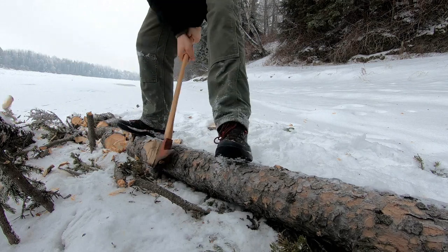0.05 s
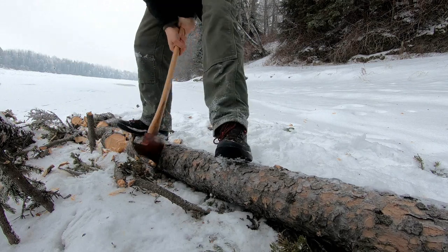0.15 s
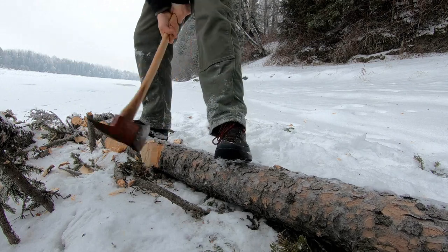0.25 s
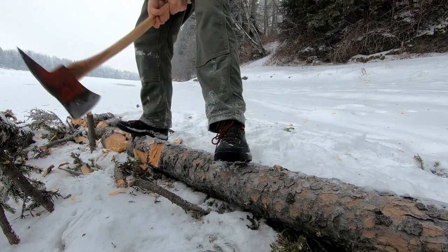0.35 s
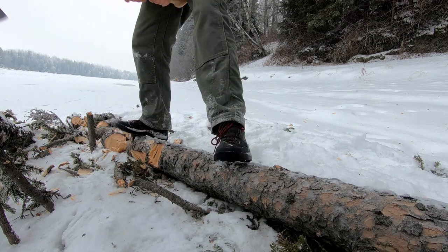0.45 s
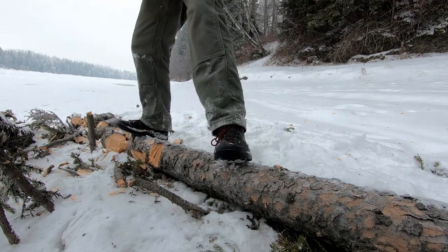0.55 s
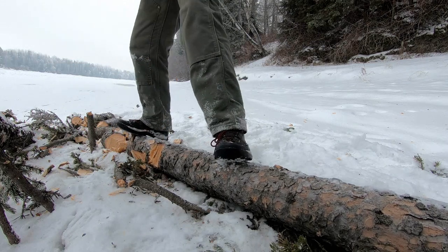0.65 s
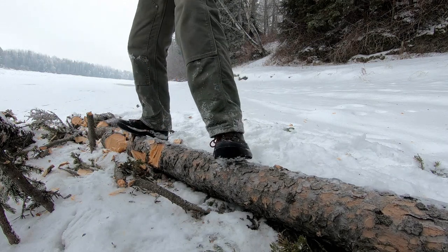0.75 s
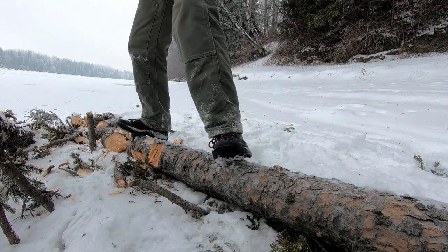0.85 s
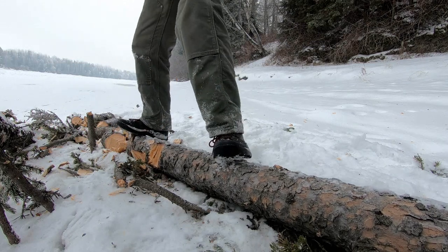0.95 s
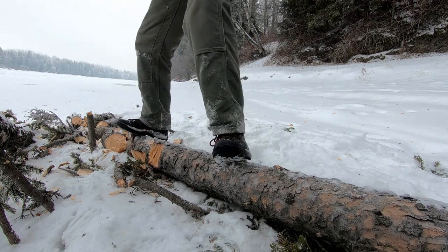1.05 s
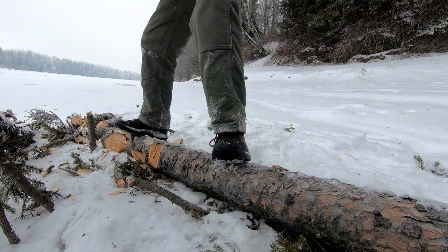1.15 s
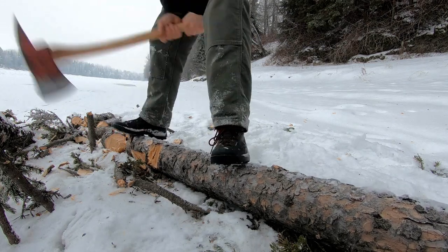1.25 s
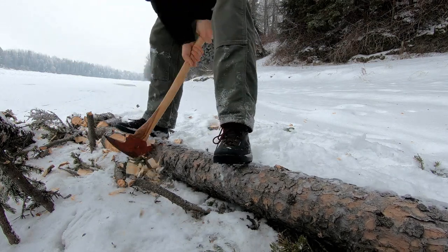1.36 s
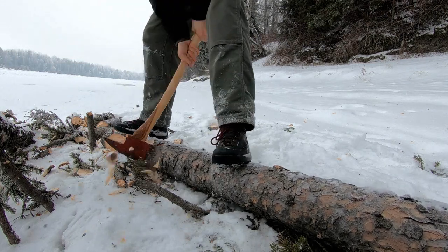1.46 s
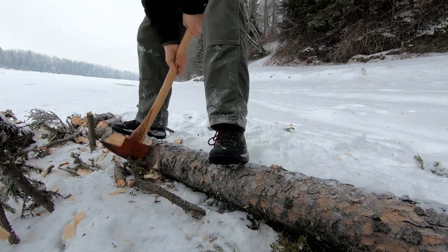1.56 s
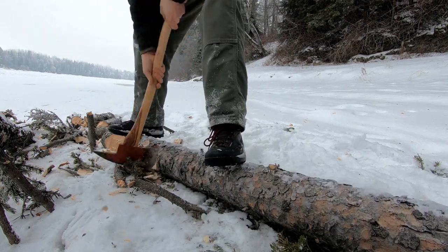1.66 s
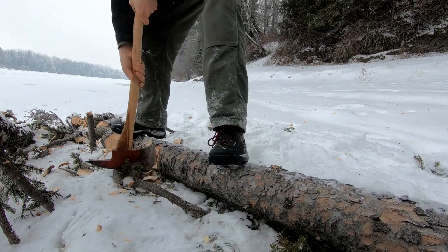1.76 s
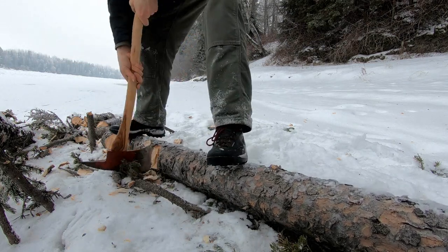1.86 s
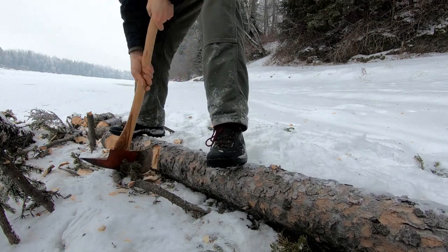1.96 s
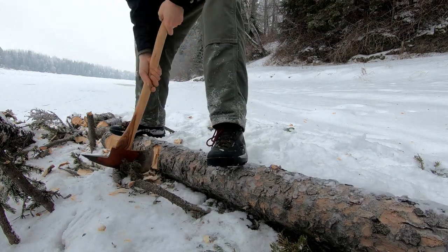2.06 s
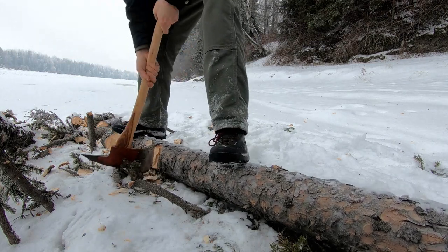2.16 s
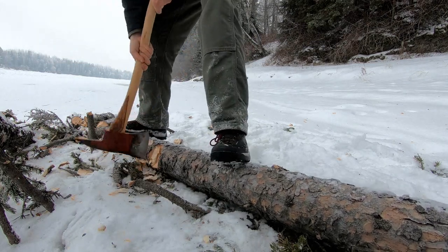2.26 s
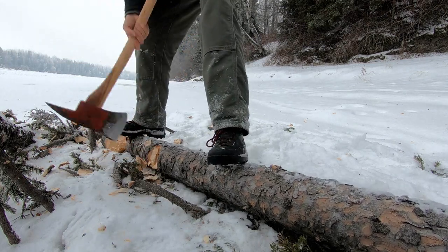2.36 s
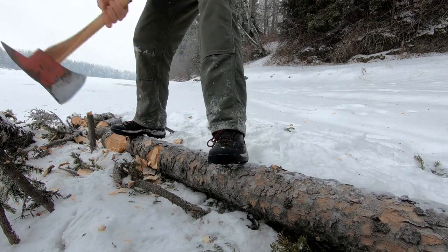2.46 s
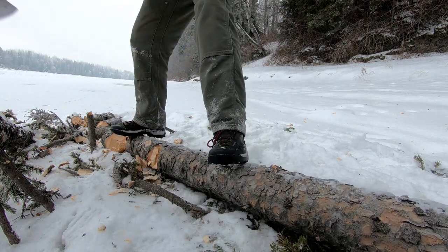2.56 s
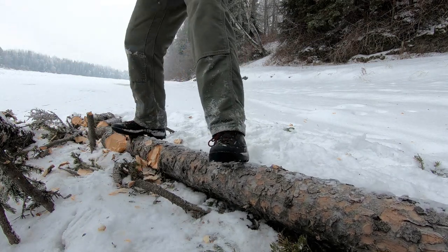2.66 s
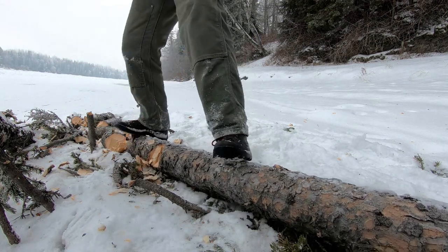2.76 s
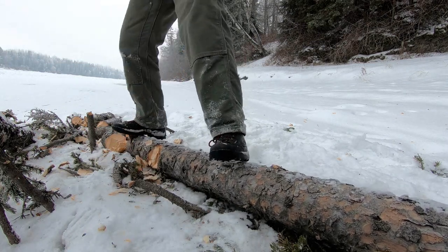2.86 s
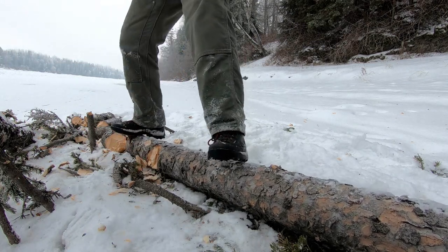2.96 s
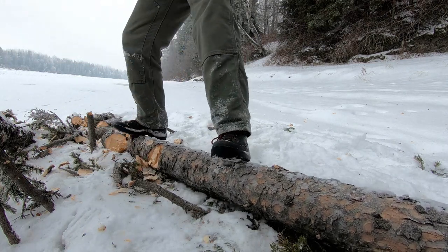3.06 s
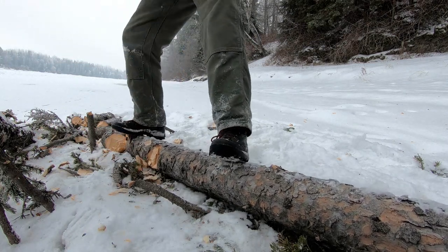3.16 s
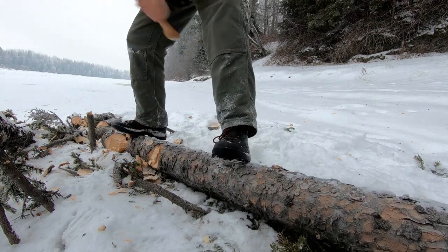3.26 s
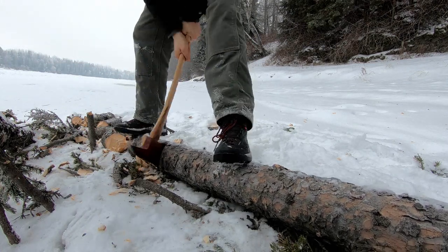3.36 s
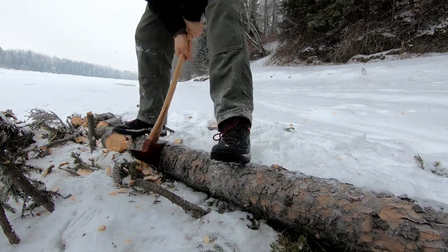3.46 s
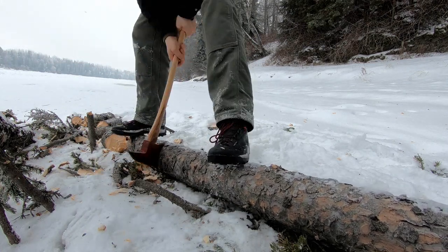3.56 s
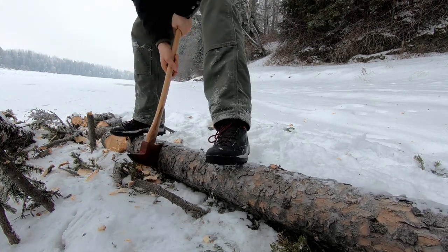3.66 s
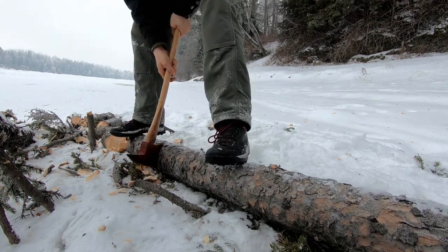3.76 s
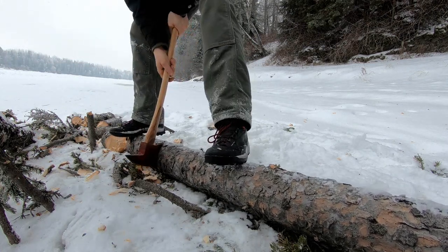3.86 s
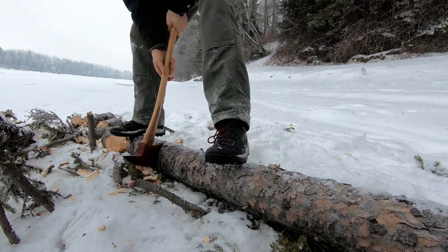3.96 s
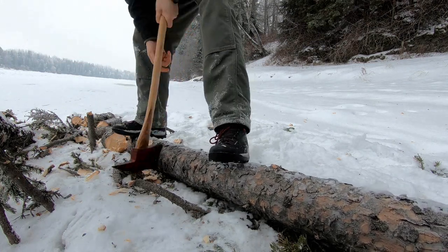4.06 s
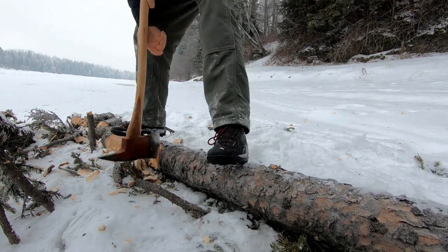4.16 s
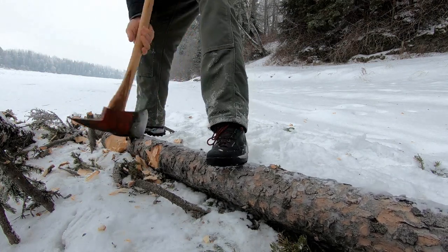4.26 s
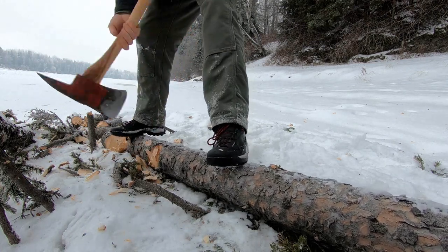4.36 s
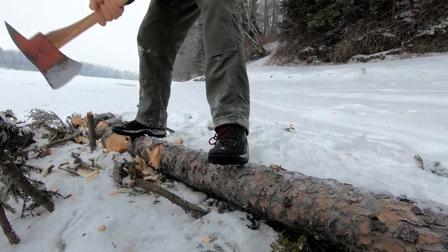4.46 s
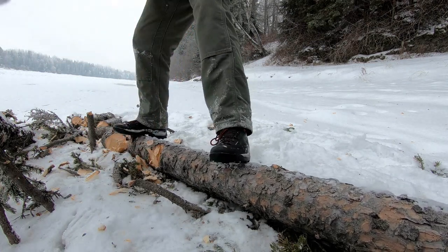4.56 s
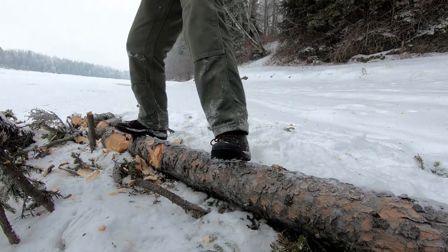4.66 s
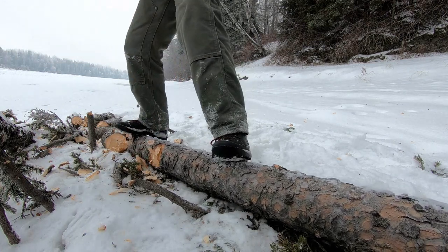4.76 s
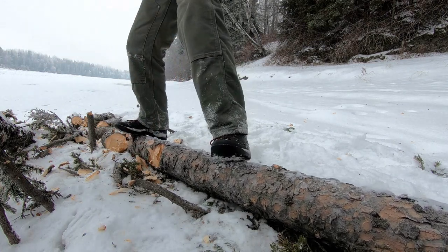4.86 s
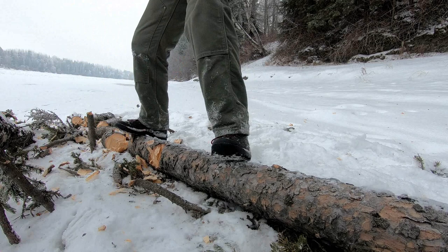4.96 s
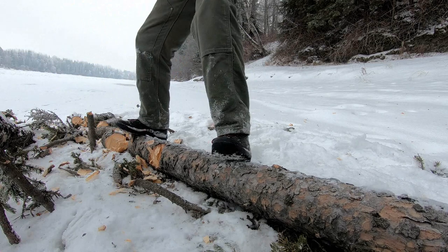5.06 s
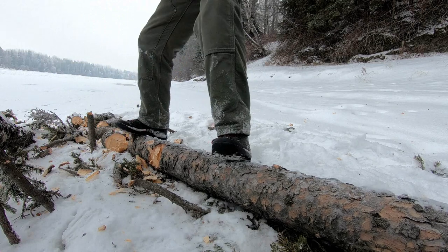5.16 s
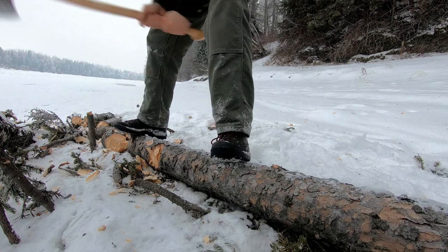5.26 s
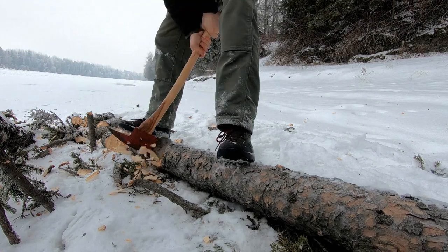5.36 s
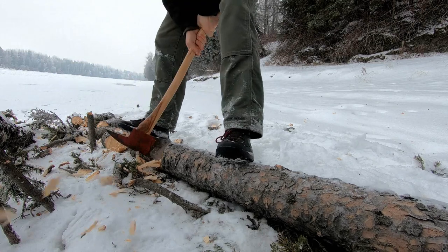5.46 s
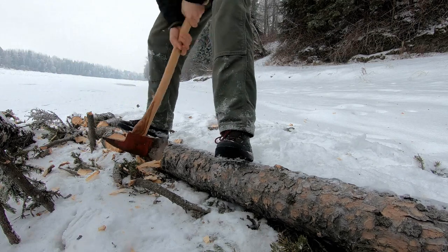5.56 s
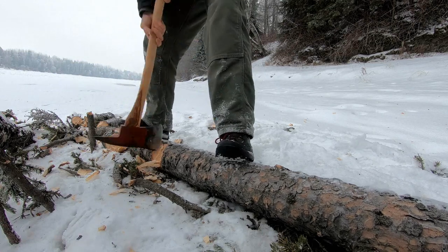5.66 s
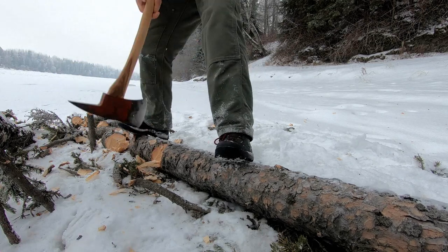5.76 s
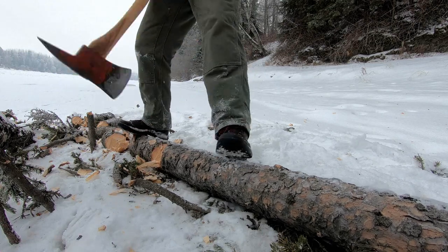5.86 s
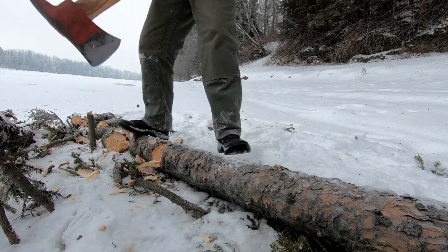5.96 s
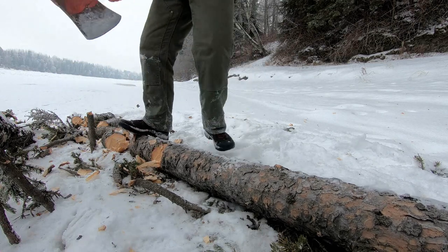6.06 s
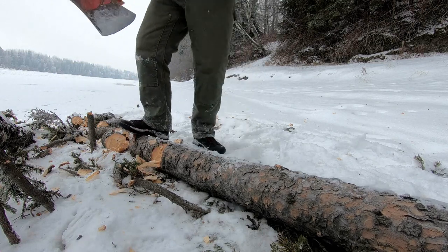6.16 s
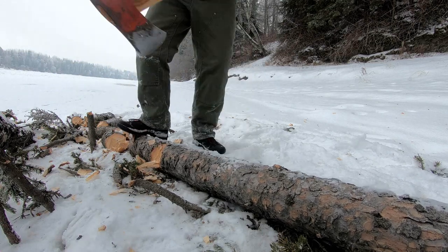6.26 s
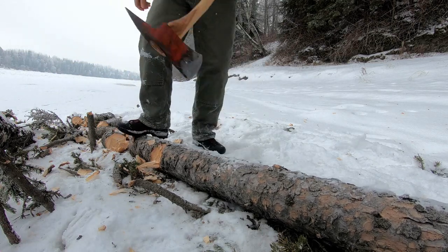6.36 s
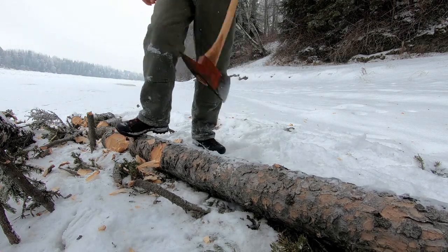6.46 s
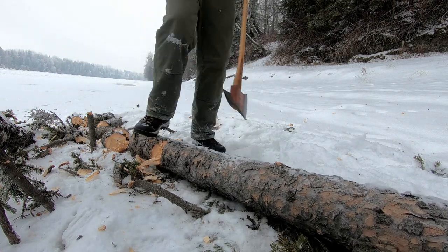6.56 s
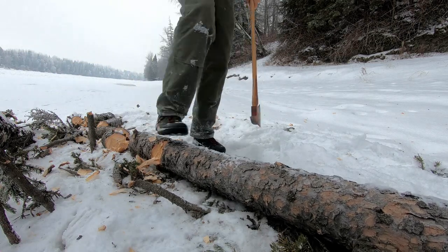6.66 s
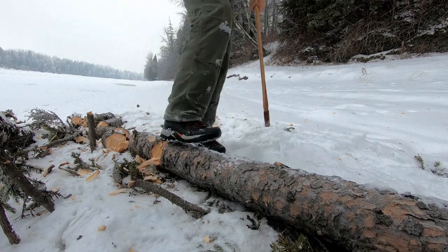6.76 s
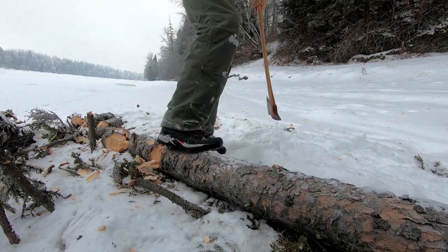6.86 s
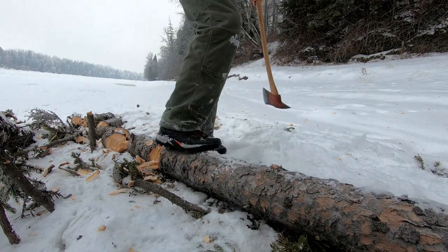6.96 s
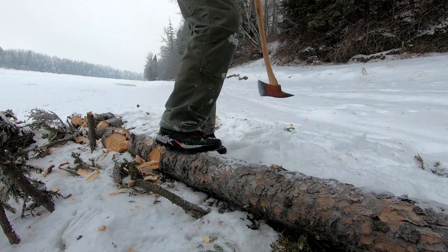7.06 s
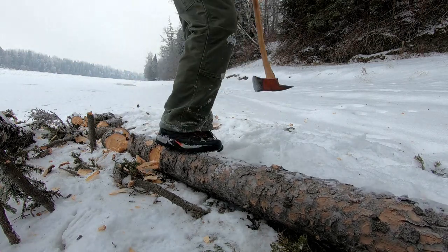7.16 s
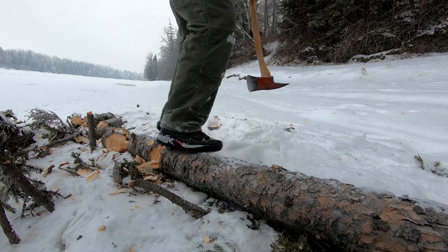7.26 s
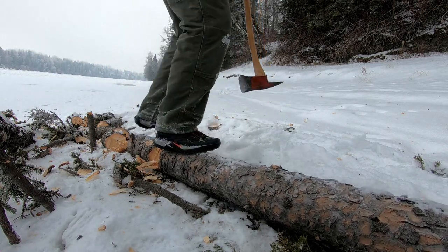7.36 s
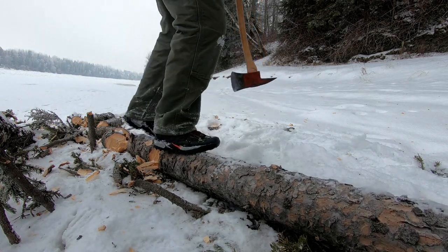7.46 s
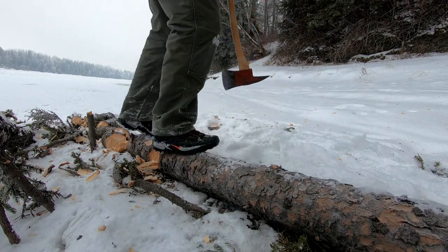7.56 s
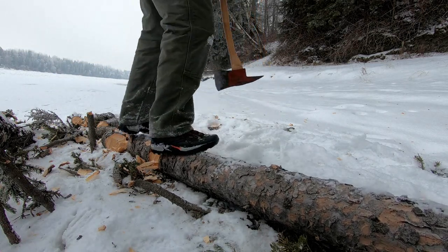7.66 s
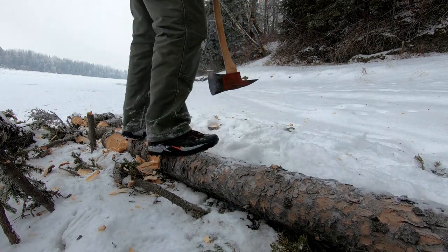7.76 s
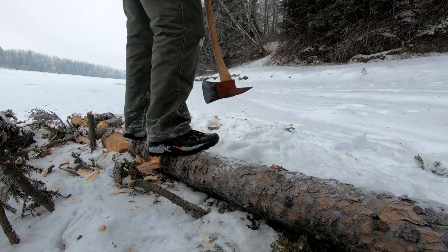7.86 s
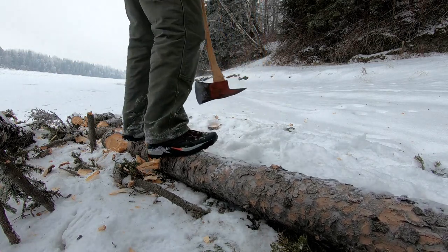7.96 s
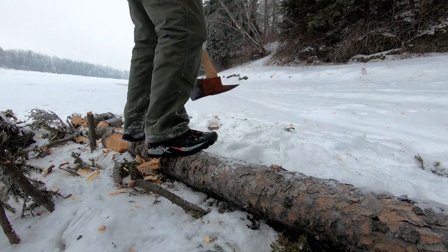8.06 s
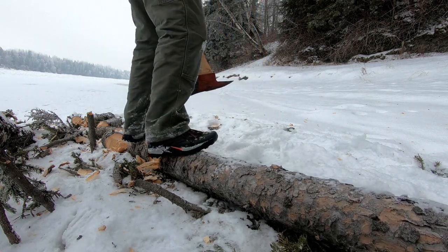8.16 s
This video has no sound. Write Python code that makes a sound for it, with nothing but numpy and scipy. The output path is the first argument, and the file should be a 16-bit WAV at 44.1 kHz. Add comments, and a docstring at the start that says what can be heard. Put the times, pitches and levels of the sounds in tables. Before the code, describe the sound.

Quiet snowy outdoors, heard close in stereo, with very faint air hush and low hum. Cloth rustles softly, then at 0.17 s an axe cracks loudly into a frozen log, hissing briefly into the hit; small snaps, a dull log jolt and sprinkling crumbs follow to about 0.45 s. A second crack at 1.5 s has a fuller low ring; at 1.9 s a chunk drops with a deep thud and a quick cluster of hollow wood knocks, mostly to the right, with another at 2.1 s. Near quiet, then a third hard blow at 3.6 s with falling splinters. Clothes swish at 4.3 to 4.5 s. The fourth blow at 5.6 s rings more sharply, and loose wood knocks around 5.75 s. Afterwards come faint rustles, soft low footfalls from 6.7 s, one dry snap at 7.0 s, and light crunches and ticks near 8 s.

```python
"""Snowy ground outdoors: an axe bites into a frozen log, which rings low after each of four blows.
Cracks are torn noise with a short ring; log, thuds and knocking chips are decaying modes.
Boots and clothes rustle as grainy noise over a faint hush of narrow noise bands, a murmur and a low hum.
All but the hush, murmur and hum passes two ports' low-pass; cracks and snaps also ring their housing."""
import sys
import numpy as np
from scipy import signal
from scipy.fft import rfft, irfft, next_fast_len
from scipy.io import wavfile

SR = 44100
rng = np.random.default_rng(int(sys.argv[2]) if len(sys.argv) > 2 else 0)


def dump(signal):
    """Clip the signal to [-1, 1] and save it as 16-bit WAV at the path in sys.argv[1]."""
    limited = np.clip(np.atleast_2d(signal).T, -1, 1)
    pcm = np.round(limited * 32767).astype(np.int16)
    wavfile.write(sys.argv[1], SR, pcm)


N = 361598
LEAD_S = .05   # every burst starts this long ahead of its hit


def amp(db):
    """Gain from dB."""
    return 10 ** (np.asarray(db) / 20)


def rms_one(x):
    """Scale to unit rms."""
    return x / np.sqrt(np.mean(x ** 2) + 1e-20)


def peak_one(x):
    """Scale to unit peak."""
    return x / np.abs(x).max()


def at_hz(points, hz):
    """Read a table on a log-frequency axis."""
    points = np.array(points)
    return np.interp(np.log(hz), np.log(points[:, 0]), points[:, 1])


def drift(rate_hz):
    """Slow random wander of spread 1: noise through a two-pole low-pass, drawn every 40 samples."""
    r = np.exp(-80 * np.pi * rate_hz / SR)
    noise = rng.standard_normal(N // 40 + 2002)
    slow = signal.lfilter([1], [1, -2 * r, r * r], noise)[2000:]
    return np.interp(np.arange(N) / 40, np.arange(len(slow)), rms_one(slow))


def add(out, s, x):
    """Mix x into out from time s."""
    i = max(round(s * SR), 0)
    out[i:i + len(x)] += x[:N - i]


def band(x, low_hz, high_hz):
    """Steep band-pass."""
    return signal.sosfilt(signal.butter(4, [low_hz, high_hz], "band", fs=SR, output="sos"), x)


def lowpass(x, order, cut_hz):
    """Butterworth low-pass."""
    return signal.sosfilt(signal.butter(order, cut_hz, fs=SR, output="sos"), x)


def brighter(x, share):
    """Tilt towards the treble, or away from it when share is negative."""
    return signal.lfilter([1, -np.clip(share, -1, 1)], [1], x)


def mode(hz, t60_s, rise_s, phase=0):
    """A decaying sine that swells in over rise_s."""
    t = np.arange(SR // 2) / SR
    swell = 1 - np.exp(-(t / rise_s) ** 2)
    return swell * amp(-60 * t / t60_s) * np.sin(2 * np.pi * hz * t + phase)


# Hush spectrum. Each row: frequency in Hz, relative level in dB per Hz.
HUSH_SPECTRUM = [(15, -21.5), (30, -8.5), (50, -19), (105, -25), (165, -9.5), (250, -15), (424, -20.5),
                 (800, -16), (1000, -22), (1400, -28.5), (2160, -31), (3780, -37), (6500, -32), (9000, -46),
                 (15000, -46.5)]
# Hush at the two ports. Each row: frequency in Hz, left-right correlation from -1 to 1.
HUSH_LIKENESS = [(60, 0.76), (120, -0.52), (250, -0.39), (500, -0.83), (1000, -0.71), (2030, -0.64),
                 (4100, 0.62), (8300, -0.4)]
HUSH_RMS_DB = -67


def hush():
    """Outdoor air and microphone hiss: wavering narrow bands, each with its own left-right likeness."""
    out, edges_hz = 0, 16 * 2 ** np.arange(0, 10.2, .4)
    white = rng.standard_normal((2, 2, N + SR))
    for k, (low_hz, high_hz) in enumerate(zip(edges_hz, edges_hz[1:])):
        sos = signal.butter(2, [low_hz, high_hz], "band", fs=SR, output="sos")
        mid, side = signal.sosfilt(sos, white[k % 2])[:, SR:]   # filter settled
        hz = np.sqrt(low_hz * high_hz)
        alike = np.clip(at_hz(HUSH_LIKENESS, hz), -1, 1)
        stereo = np.sqrt(1 + alike) * mid + np.sqrt(1 - alike) * side * [[1], [-1]]
        out = out + amp(at_hz(HUSH_SPECTRUM, hz) + 1.2 * drift(6.0)) * stereo
    return amp(HUSH_RMS_DB) * rms_one(out)


MURMUR_HZ, MURMUR_RMS_DB = (700, 880), -80


def murmur():
    """Narrow steady noise, partly opposite at the two ports."""
    shared, left, right = band(rng.standard_normal((3, N)), *MURMUR_HZ)
    return amp(MURMUR_RMS_DB) * rms_one(np.array([left + 1.2 * shared, right - 0.4 * shared]))


# Low hum. Each row: frequency in Hz, level in dB before the common 1 dB cut.
HUM_PARTIALS = [(30, -67.5), (60, -77), (90, -88)]


def hum():
    """Three low sine partials, each wavering about 1 dB; right is 0.6 dB above left."""
    t, out = np.arange(N) / SR, 0
    for hz, db in HUM_PARTIALS:
        out = out + amp(db - 1 + 1.0 * drift(1.8)) * np.sin(2 * np.pi * hz * t)
    return out * amp([[-.3], [.3]])


# Housing resonances. Each row: frequency in Hz, width in Hz, level in dB.
HOUSING_MODES = [(730, 100, -10), (1200, 600, -3), (1570, 200, -1), (2010, 97, -12.5), (2470, 360, -1),
                 (2815, 290, 4.5), (3450, 520, -16.5), (5224, 740, -17), (5840, 820, -12), (6920, 750, -19)]


def housing(x):
    """Parallel resonances of the ports, signs alternating."""
    out = 0
    for k, (hz, width_hz, db) in enumerate(HOUSING_MODES):
        r = np.exp(-np.pi * width_hz / SR)
        b = (1 - r * r) / 2 * np.array([1, 0, -1])
        a = [1, -2 * r * np.cos(2 * np.pi * hz / SR), r * r]
        out = out + (-1) ** k * amp(db) * signal.lfilter(b, a, x + 1e-18)
    return out


# Cloth and boots in snow. Each row: middle in seconds, half length in seconds, fine rustle in dB,
# coarse crunch in dB.
SWISH_TIMES = [(.05, .12, -77, -92), (0.448, 0.14, -78.5, -89.5), (1.45, 0.057, -77.5, -88.5),
               (1.8, 0.11, -74.5, -81.5), (2.68, .07, -78, -91), (3.47, .07, -77.5, -85),
               (4.276, 0.039, -69, -92), (4.506, 0.072, -74, -85), (5.47, 0.065, -79.5, -80),
               (5.72, 0.069, -72.5, -76), (5.879, .09, -71.5, -87), (7.091, 0.064, -72, -78),
               (7.453, .25, -88.5, -81.5), (7.96, 0.098, -72, -74), (8.111, 0.055, -80.5, -72)]
# Crumbs and splinters raining down after each blow and after the chunk lands.
# Each row: start in seconds, level in dB, t60 in seconds.
CRUMB_FALLS = [(.167, -63.5, 0.94), (1.533, -66, 0.7), (1.893, -55.5, 0.38), (3.582, -60.5, 0.54),
               (5.562, -67.5, 1.13)]
CALM_FINE_DB, CALM_COARSE_DB = -87, -89   # between the swishes
CRUMBS_RISE_S, CRUMBS_GRAIN_DB, CRUMBS_GRAIN_RATE_HZ = 0.013, 6, 130


def rustle_levels():
    """Fine and coarse gain of a calm bed with bell-shaped swishes; gain of crumbs that swell and die."""
    t = np.arange(N) / SR
    gain, crumbs = amp([[CALM_FINE_DB], [CALM_COARSE_DB]]) * np.ones(N), 0
    for s, half_s, fine_db, coarse_db in SWISH_TIMES:
        gain = gain + amp([[fine_db], [coarse_db]]) * np.exp(-((t - s) / half_s) ** 2)
    for s, db, t60_s in CRUMB_FALLS:
        after = np.maximum(t - s, 0)
        swell = 1 - np.exp(-(after / CRUMBS_RISE_S) ** 2)
        crumbs = crumbs + swell * amp(db - 60 * after / t60_s)
    grain = amp(CRUMBS_GRAIN_DB * np.minimum(drift(CRUMBS_GRAIN_RATE_HZ), 2))
    return *gain, crumbs * grain


RUSTLE_FLICKER_DB, RUSTLE_BRIGHTNESS = 2.2, .9
CRUNCH_HZ, CRUMBS_HZ, CRUMBS_COARSE_DB = (1250, 1800), (900, 2600), -0.5


def rustle():
    """Cloth and crumbs: grainy noise, slightly opposite at the two ports."""
    fine_gain, coarse_gain, crumbs = rustle_levels()
    shared, own = rng.standard_normal((2, N)), rng.standard_normal((2, N))
    thin = brighter(0.11 * shared[0] * [[1], [-1]] + own, RUSTLE_BRIGHTNESS)
    flicker = amp(RUSTLE_FLICKER_DB * drift(31))
    fine = (fine_gain + crumbs) * flicker * rms_one(housing(thin))
    rough = shared[1] * [[1], [-1]] + 2.4 * own[::-1, ::-1]
    coarse = coarse_gain * amp(2.6 * drift(30)) * rms_one(band(rough, *CRUNCH_HZ))
    return fine + coarse + crumbs * amp(CRUMBS_COARSE_DB) * rms_one(band(rough, *CRUMBS_HZ))


# Hiss into the first crack. Each row: frequency in Hz, width in Hz, level in dB.
LEAD_IN_BANDS = [(1511.6, 130, -0.5), (2387, 220, -2), (3768, 390, -7.5), (5544, 260, -11)]
LEAD_IN_PEAK_S, LEAD_IN_DB, LEAD_IN_GROW_MS, LEAD_IN_DIE_MS = .174, -16, 7.5, 4.3


def lead_in():
    """Narrow hissing bands swell up into the first crack, then die."""
    ms = np.arange(SR // 10) / SR * 1000 - 60
    swell = np.exp(np.minimum(ms, 0) / LEAD_IN_GROW_MS - np.maximum(ms, 0) / LEAD_IN_DIE_MS)
    out, noise, hiss = np.zeros(N), rng.standard_normal(len(ms)), 0
    for hz, width_hz, db in LEAD_IN_BANDS:
        hiss = hiss + amp(db) * rms_one(band(noise, hz - width_hz / 2, hz + width_hz / 2))
    add(out, LEAD_IN_PEAK_S - .06, amp(LEAD_IN_DB) * swell * hiss)
    return out


def burst(creep_db, creep_ms, length_ms, tail_db, tail_ms):
    """Fibres tearing: noise that creeps in, holds and dies; starts LEAD_S ahead of the hit."""
    ms = np.arange(SR // 4) / SR * 1000 - 1000 * LEAD_S
    after = np.maximum(ms, 0)
    creep = amp(creep_db) * np.exp(np.minimum(ms, 0) / creep_ms) * (ms < 0)
    hold = np.exp(-(after / length_ms) ** 4 - 0.13 * after / length_ms)
    tail = amp(tail_db) * np.exp(-after / tail_ms)
    hit = (1 - np.exp(-after / 0.96)) * (hold + tail)
    return (creep + hit) * rng.standard_normal(len(ms))


def snap(length_ms, share):
    """One short crack as the housing colours it, peak 1."""
    return peak_one(housing(brighter(burst(-38.5, 1, length_ms, -16.0, 15.0), share)))


# Log modes, before the pitch and damping factors and the tilt of each push.
# Each row: frequency in Hz, level in dB, t60 in seconds.
LOG_MODES = [(55.6, -11.5, 0.27), (87.8, -14.5, 0.81), (112.3, 0.5, .64), (136.6, -16, 1),
             (143.6, 3.5, 0.36), (171, -7, 0.37), (228, -4, .09), (276, -11, 0.23), (318.4, -7, 0.067),
             (390, -20, 0.04), (463, -17, 0.2), (520, -22.5, 0.015), (576, -20.5, 0.062)]
LOG_RISE_CYCLES, LOG_SETTLE_S = 1.4, .16
LOG_HEAD_START_S = .004   # the log is already moving while the edge sinks in


def log_ring(pitch, damping, tilt_db_per_octave):
    """Low modes need some cycles to build; the snow bed swallows the end of the ring."""
    t, ring = np.arange(SR // 2) / SR, 0
    for hz, db, t60_s in LOG_MODES:
        phase = 2 * np.pi * hz * pitch * LOG_HEAD_START_S
        gain = amp(db + tilt_db_per_octave * np.log2(hz / 108))
        ring = ring + gain * mode(hz * pitch, t60_s * damping, LOG_RISE_CYCLES / hz, phase)
    return ring * np.exp(-(t / LOG_SETTLE_S) ** 6)


# Axe blows. Each row: hit in seconds, crack in dB, brightness from -1 to 1, early ticks in dB,
# splitting before the hit in dB and in ms, crack length in ms, woody body in dB, log in dB,
# log tilt in dB per octave (positive is brighter), crack ring in dB.
AXE_BLOWS = [(.167, -3.5, -.6, -31, -20, 7.1, 12.4, -17.5, -27.5, 3, -7),
             (1.533, -6.5, 0.55, -56, -12, 5, 9, -12.5, -17, 0.4, -8.5),
             (3.582, -4.5, 0.02, -31, -55.5, 11.3, 6.45, -16.5, -16.5, -2, -4.5),
             (5.562, -9.5, 0.2, -25, -48, 7.7, 4.7, -21.5, -15, -2, 2)]
# Short ring near 2.8 kHz in each crack. Each row: frequency in Hz, dB against the crack ring,
# t60 in seconds.
CRACK_RING_MODES = [(2656, -1, .024), (2964, -7.5, 0.026)]
EARLY_TICK_S = 0.012   # two faint ticks before each crack, this far apart
CRACK_TAIL_DB, CRACK_TAIL_MS = -30, 12


def axe():
    """Each blow cracks the wood with a short ring, rattles the woody body and sets the log ringing."""
    crack, log = np.zeros(N), np.zeros(N)
    for (s, db, bright, tick_db, creep_db, creep_ms, length_ms,
         body_db, log_db, tilt_db, crack_ring_db) in AXE_BLOWS:
        start = s - LEAD_S
        tear = burst(creep_db, creep_ms, length_ms, CRACK_TAIL_DB, CRACK_TAIL_MS)
        add(crack, start, amp(db) * peak_one(housing(brighter(tear, bright))))
        for hz, mode_db, t60_s in CRACK_RING_MODES:
            add(crack, s, amp(crack_ring_db + mode_db) * mode(hz, t60_s, 0.00075))
        add(crack, start - EARLY_TICK_S, amp(tick_db) * snap(6.0, bright))
        add(crack, start - 2 * EARLY_TICK_S, amp(tick_db - 10) * snap(4.7, bright))
        body = band(burst(creep_db, creep_ms, 2 * length_ms, -17, 25.0), 900, 1500)
        add(log, start, amp(body_db) * peak_one(body))
        low_body = band(burst(-38, 1, 33.0, -7.5, 35.0), 160, 650)
        add(log, start + .006, amp(body_db - 6.0) * peak_one(low_body))
        add(log, s, amp(log_db) * log_ring(0.97, 0.99, tilt_db))
    return crack, log


TREES_DB, TREES_T60_S, TREES_DELAY_S = -37, 0.5, 0.014


def trees(x):
    """A faint diffuse return from the wood's edge: decaying noise that swells in after a gap."""
    t = np.arange(SR // 2) / SR
    swell = 1 - np.exp(-(t / TREES_DELAY_S) ** 4)
    tail = rng.standard_normal((2, len(t))) * amp(-60 * t / TREES_T60_S) * swell
    tail = tail / np.sqrt(np.sum(tail ** 2) / 2)
    return amp(TREES_DB) * signal.fftconvolve(x[None], tail, axes=1)[:, :N]


# Dry snaps of bark and ice. Each row: hit in seconds, peak in dB, length in ms.
SNAP_HITS = [(.2014, -36, 3.4), (.2294, -34.5, 29), (.2894, -44.5, 5.4), (.3311, -45, 7.3),
             (0.359, -42, 6.5), (1.4715, -50, 7.2), (1.5923, -37.5, 6), (1.7365, -58, 6), (1.788, -53.5, 4),
             (1.876, -45.5, 15), (1.8582, -54, 6.6), (3.5119, -39, 5.4), (3.6416, -40.5, 5.4),
             (5.5044, -44, 7.9), (5.6176, -64, 5.4), (5.679, -46, 7.2), (5.6994, -40, 3.9),
             (5.8694, -45, 14), (5.9389, -50, 4.5), (6.0601, -55.5, 18), (6.077, -53.5, 4),
             (6.33, -49.5, 7.3), (6.8094, -58, 6), (7.0309, -23.5, 5.7), (7.8895, -43, 2.9),
             (7.9153, -53.5, 6.7), (7.9493, -49, 6.1), (7.9774, -49.5, 6.7), (8.0152, -55.5, 5.1)]
SNAP_BRIGHT, SNAP_BRIGHT_PER_DB = .45, -0.96   # brightness at -49 dB; faint snaps are thinner


def snaps():
    """Short tearing bursts."""
    out = np.zeros(N)
    for s, db, length_ms in SNAP_HITS:
        bright = SNAP_BRIGHT + SNAP_BRIGHT_PER_DB * (db + 49)
        add(out, s - LEAD_S, amp(db) * snap(length_ms, bright))
    return out


# Jolts reaching log and ground without a crack. Each row: start in seconds, log in dB,
# log pitch factor, log t60 factor, ground in dB, left minus right in dB.
JOLT_PUSHES = [(0.246, -13, 1.104, 0.41, -58, -2), (1.911, -35.5, 1.38, 1, -23, -6),
               (1.963, -31, .8, .5, -20.5, -3.5), (2.04, -48.5, 1, 0.58, -32, -4),
               (2.2, -67.5, 1.2, .46, -50.5, 2), (5.772, -32, .95, .37, -47, -8),
               (6.73, -76, 1.04, 0.58, -49, -4), (6.829, -62, 1.32, .56, -37.5, -4.5),
               (6.923, -86, 1.5, .64, -48, 2), (7.033, -62, 1.2, 0.66, -33.5, 2.5),
               (7.102, -37, 0.99, 0.47, -58.5, 3), (7.228, -67, 1.45, 0.82, -34.5, 1.5),
               (7.309, -76.5, 0.93, .78, -41.5, -3)]
GROUND_FIRST_HZ, GROUND_LAST_HZ, GROUND_SETTLE_S, GROUND_T60_S = 41, 30, 0.037, 0.33
GROUND_RISE_S = 0.049 * GROUND_LAST_HZ / GROUND_FIRST_HZ


def jolts():
    """Dull pushes into the log; a low ground throb swells in, settling from 41 to 30 Hz."""
    out, t = np.zeros((2, N)), np.arange(SR // 2) / SR
    hz = GROUND_LAST_HZ + (GROUND_FIRST_HZ - GROUND_LAST_HZ) * np.exp(-(t / GROUND_SETTLE_S) ** 2)
    swell = (1 - np.exp(-(t / GROUND_RISE_S) ** 2)) * amp(-60 * t / GROUND_T60_S)
    ground = swell * np.sin(2 * np.pi * np.cumsum(hz) / SR)
    for s, log_db, pitch, damping, ground_db, pan_db in JOLT_PUSHES:
        push = amp(log_db) * log_ring(pitch, damping, 0.1) + amp(ground_db) * ground
        add(out[0], s, amp(pan_db / 2) * push)
        add(out[1], s, amp(-pan_db / 2) * push)
    return out


# Wood pieces knocking. Each row: hit in seconds, knock in dB, pitch in Hz, low pitch in Hz,
# low level in dB, snap in dB, rattle in dB.
KNOCK_HITS = [(.249, -40, 1380, 306, -18, -32, -34), (.361, -41, 1250, 306, -42, -37, -41),
              (.423, -42, 1390, 310.5, -57, -56.5, -50), (1.661, -49, 1166, 291, -55.5, -46.5, -56),
              (1.773, -34, 1220, 537, -32.5, -65, -45.5), (1.892, -19.5, 1003, 366.4, -21.5, -13, -21.5),
              (1.911, -17.5, 1150, 305.3, -28, -17.5, -20.5), (1.924, -31, 1125, 293.5, -30.5, -43.5, -27),
              (1.939, -26.5, 1206, 342, -51, -33, -30.5), (1.958, -36.5, 1072, 283, -47, -51.5, -33.5),
              (1.978, -29.5, 1140, 438.3, -37, -44, -35), (2.081, -21.5, 1135, 590.2, -28.5, -40, -33.5),
              (2.329, -58.5, 1570, 570.2, -85, -57, -82), (3.677, -48.5, 1130, 287, -69.5, -60, -56.5),
              (4.372, -62.5, 1220, 520, -69, -73, -69), (5.678, -45, 915, 304, -40.5, -37.5, -46.5),
              (5.736, -25, 1490, 334.3, -24.5, -46.5, -34), (5.767, -13.5, 1230, 321, -37, -40, -30.5),
              (5.833, -43.5, 1150, 347, -48.5, -65, -54.5), (5.857, -46.5, 1230, 300, -45.5, -57.5, -48.5),
              (5.986, -57, 1030, 390, -49.5, -64, -62.5), (6.735, -62.5, 902, 414, -54.5, -80.5, -66),
              (6.836, -76, 1015, 326, -59.5, -80, -78), (7.082, -60, 1532, 328, -56, -80, -56)]
# The trunk answers each knock. Each row: frequency in Hz, dB against the knock, t60 in seconds.
TRUNK_MODES = [(1138, -21.5, 0.17), (590, -20.5, 0.09)]
KNOCK_T60_S, KNOCK_TOP_HZ = .042, 1820
KNOCK_SNAP_TOP_HZ = 4200   # blunt wood on wood has little treble


def knocks():
    """A loose piece rings in a cluster of close modes and a lower pair, rattles on, and snaps on top."""
    wood, top, t60_s = np.zeros(N), np.zeros(N), KNOCK_T60_S
    phases = rng.uniform(0, 2 * np.pi, (len(KNOCK_HITS), 5))
    for (s, db, hz, low_hz, low_db, snap_db, rattle_db), phase in zip(KNOCK_HITS, phases):
        start = s - LEAD_S
        high = mode(hz, t60_s, 0.00072, phase[0])
        high = high + 1.2 * mode(hz * 1.1, t60_s * 0.34, 0.00062, phase[1])
        high = high + 0.47 * mode(hz * 0.72, t60_s, 0.0034, phase[2])
        for ring_hz, ring_db, ring_t60_s in TRUNK_MODES:
            high = high + amp(ring_db) * mode(ring_hz, ring_t60_s, 0.0011, phase[2])
        low = mode(low_hz, t60_s * 2.9, 0.0027, phase[3])
        low = low + .45 * mode(low_hz * 1.3, t60_s * 2.4, .003, phase[4])
        add(wood, s, amp(db) * high + amp(low_db) * low)
        rattle = band(burst(-24.5, 5.0, 14.0, -13.0, 30.0), 310, 1500)
        add(wood, start, amp(rattle_db) * peak_one(rattle))
        add(top, start, amp(snap_db) * snap(5.6, -0.8))
    return lowpass(wood, 4, KNOCK_TOP_HZ), lowpass(top, 2, KNOCK_SNAP_TOP_HZ)


# Falling chunks and boots. Each row: start in seconds, level in dB, pitch factor, t60 factor,
# weight on the deep modes in dB, left minus right in dB.
THUD_HITS = [(1.782, -46.5, 1.04, 0.7, -14, -1.5), (1.893, -14.5, 1.04, 1.14, -1.7, -8.5),
             (2.084, -33.5, 1.04, 0.72, -5.5, -8), (5.771, -28.5, 1.05, 0.53, 2.5, -8.5),
             (5.858, -48, 1.02, 0.66, -17, -5), (5.989, -47, 1.03, 0.87, -23, -6.5),
             (6.742, -53, 0.97, 1.5, -15, -2.5), (6.795, -50.5, 0.94, 1.22, -18, 2),
             (7.031, -53.5, .85, 1.01, -16, 2.5), (7.939, -60, 0.93, 1.5, -13.5, 4),
             (8.039, -62.5, 0.98, 0.67, -11.5, -0.8)]
# Thud modes, before those factors. Each row: frequency in Hz, level in dB, t60 in seconds.
THUD_MODES = [(80.63, 1.5, 0.27), (116, -13, 0.067), (157.4, 0.04, 0.33)]
THUD_RISE_CYCLES, THUD_SETTLE_S, DEEP_BELOW_HZ = 0.76, 0.12, 140


def thuds():
    """A few low modes swell in and ring until the snow swallows them."""
    out, t = np.zeros((2, N)), np.arange(SR // 2) / SR
    for s, db, pitch, damping, deep_db, pan_db in THUD_HITS:
        ring = 0
        for hz, mode_db, t60_s in THUD_MODES:
            gain = amp(db + mode_db + deep_db * (hz < DEEP_BELOW_HZ))
            ring = ring + gain * mode(hz * pitch, t60_s * damping, THUD_RISE_CYCLES / hz)
        ring = ring * np.exp(-(t / THUD_SETTLE_S) ** 6)
        add(out[0], s, amp(pan_db / 2) * ring)
        add(out[1], s, amp(-pan_db / 2) * ring)
    return out


def ports(x, lead, balance):
    """The two ports hear one source with their own phase and level at each pitch."""
    size = next_fast_len(N)
    hz = np.arange(size // 2 + 1) * SR / size + 1
    half = amp(at_hz(balance, hz) / 2) * np.exp(.5j * np.interp(hz, *np.transpose(lead)))
    return irfft(rfft(x, size) * [half, 1 / half], size)[:, :N]


# Port phase for axe and for chips. Each row: frequency in Hz, left lead in radians.
AXE_PHASE = [(0, 0), (260, 0.4), (690, -3.0), (1380, -3.6), (2070, 1.8), (2670, 3.7), (4050, 4.0),
             (4820, 6.1), (5340, 10.4), (5940, 12.8), (6290, 17.4), (6980, 15.5), (7580, 10.9),
             (8440, 12.1)]
CHIP_PHASE = [(0, 0), (300, -.3), (580, -3.1), (1290, -4.0), (2150, -4.2), (3200, -2.0)]
# Port level for axe and for chips. Each row: frequency in Hz, left minus right in dB.
AXE_LEVEL = [(60, -1.0), (100, -0.5), (180, 0.0), (310, -2.0), (540, -3.5), (930, -2.0), (1600, 1.0),
             (2780, 1.5), (4800, 4.5), (8300, -1.5)]
CHIP_LEVEL = [(60, -16), (100, -3), (180, -12), (310, -14.5), (540, -16.5), (930, -11.5), (1600, -8),
              (2780, -3), (4800, -27), (8300, -10.5)]
PORT_CUT_HZ = 7500


def scene():
    """Axe and loose wood reach the ports from two sides; the ports' membranes stop the top."""
    crack, log = axe()
    wood, top = knocks()
    bright = crack + lead_in() + top + snaps()
    near = ports(bright + log, AXE_PHASE, AXE_LEVEL) + ports(wood, CHIP_PHASE, CHIP_LEVEL)
    near = near + jolts() + thuds()
    near = near + trees(band(bright + wood + log, 300, 7100)) + rustle()
    return lowpass(near, 10, PORT_CUT_HZ) + hush() + murmur() + hum()


STOP_HZ, STOP_DB = 15850, 60


def record(dry):
    """Steep low-pass: everything above STOP_HZ is at least STOP_DB down."""
    return signal.sosfilt(signal.cheby2(12, STOP_DB, STOP_HZ, fs=SR, output="sos"), dry)


dry = scene()
out = record(dry)
dump(out)
```